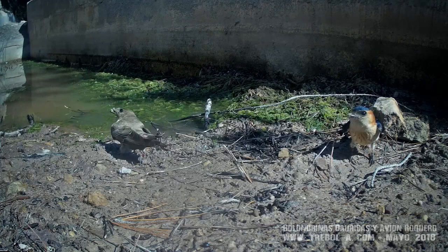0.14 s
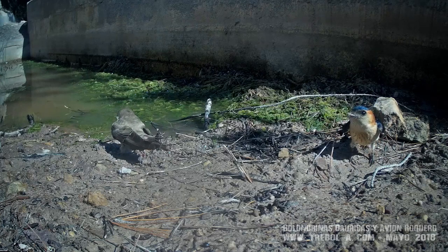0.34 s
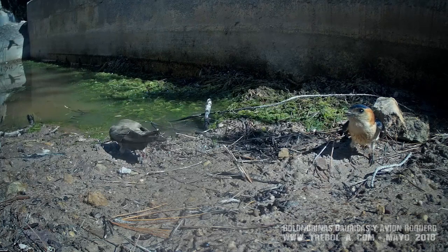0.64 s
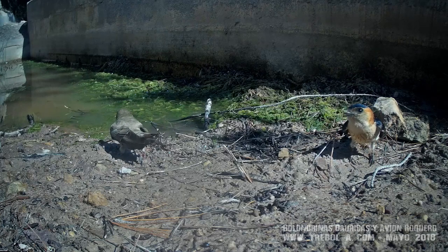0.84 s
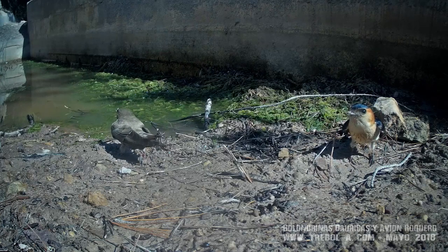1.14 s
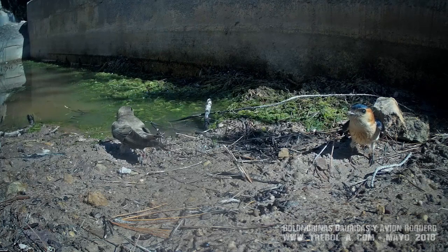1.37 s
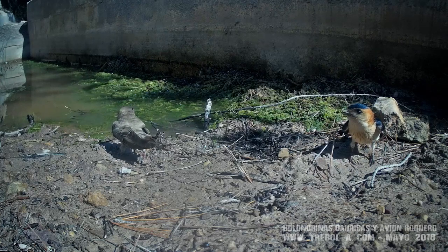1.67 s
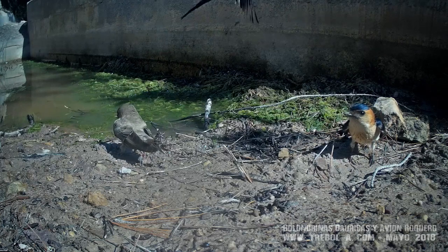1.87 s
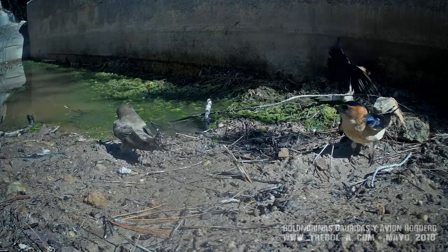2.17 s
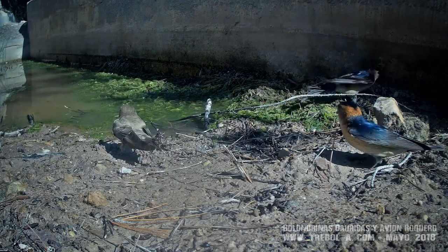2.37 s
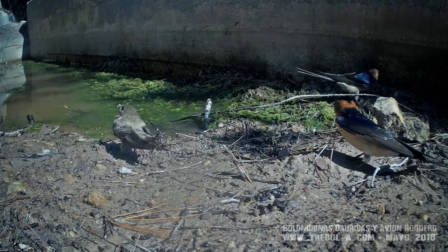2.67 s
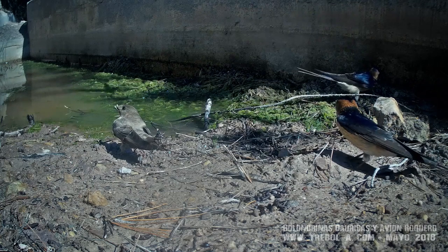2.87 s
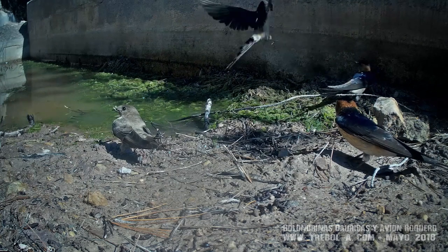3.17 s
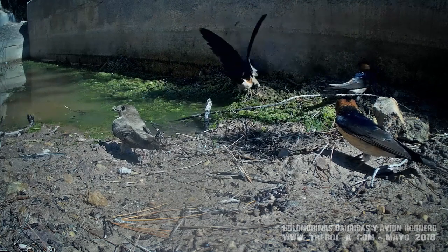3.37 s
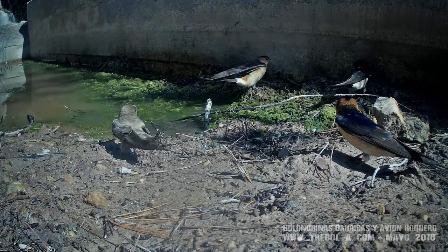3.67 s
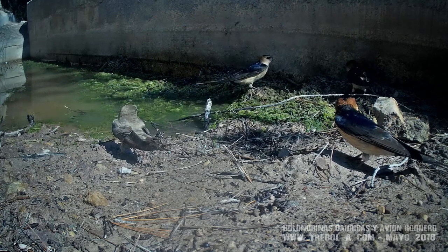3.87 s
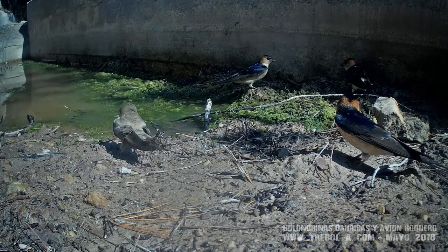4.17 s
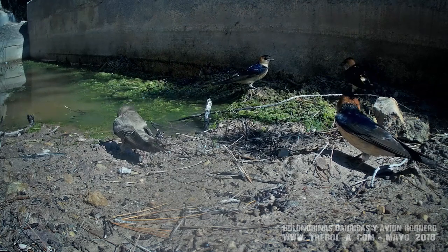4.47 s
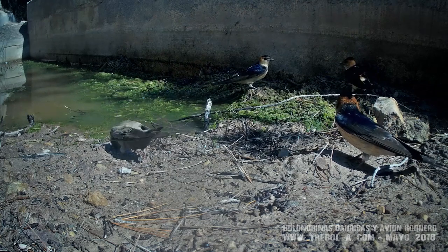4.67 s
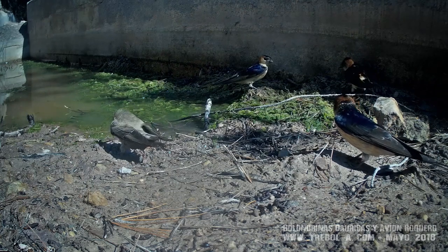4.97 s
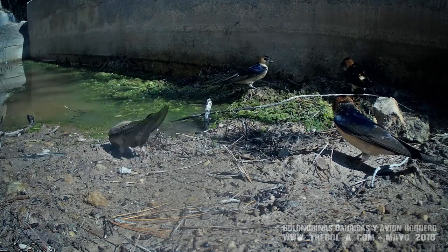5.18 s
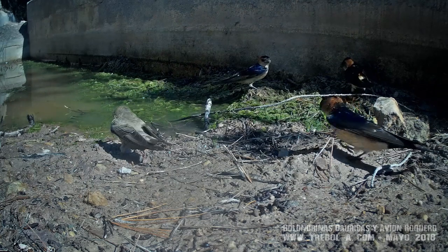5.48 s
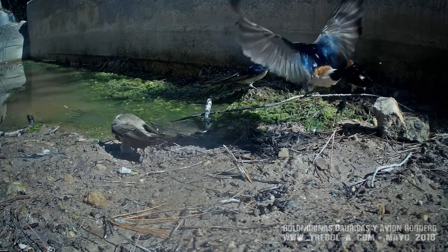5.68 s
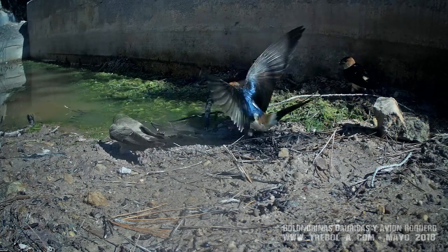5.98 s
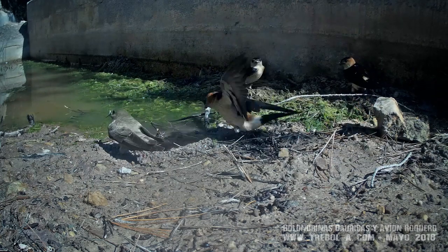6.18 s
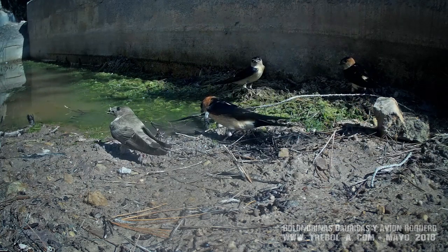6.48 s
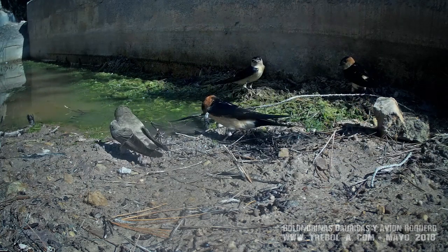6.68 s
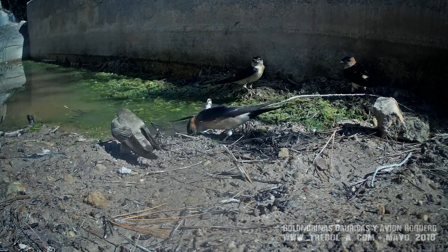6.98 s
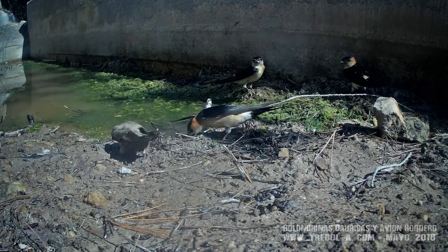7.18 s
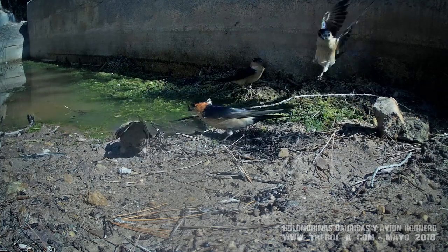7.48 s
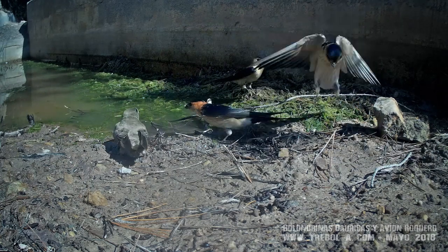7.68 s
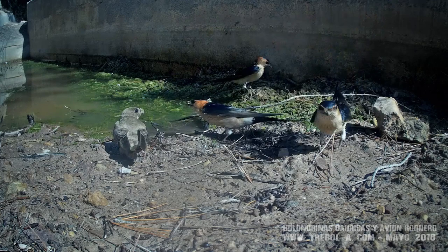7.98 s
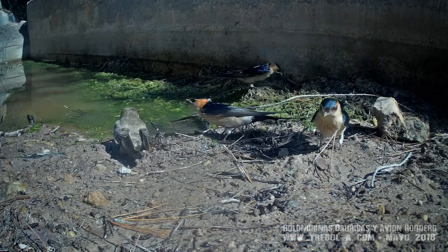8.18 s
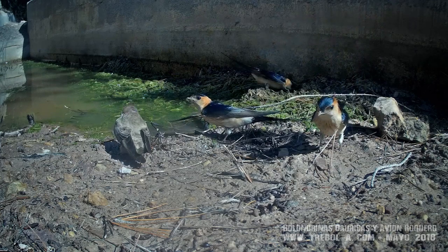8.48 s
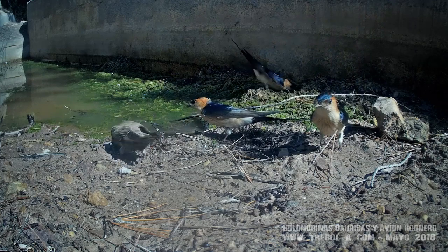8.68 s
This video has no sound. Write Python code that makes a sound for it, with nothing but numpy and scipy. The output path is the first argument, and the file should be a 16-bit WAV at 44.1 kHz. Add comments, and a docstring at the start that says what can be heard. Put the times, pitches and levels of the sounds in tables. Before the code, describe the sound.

Small birds trade short, bright chirps beside a muddy puddle, one close and others more distant, over a faint rush of air.

```python
"""A nearby swallow gives quick two-part chirps at a muddy puddle under a concrete wall. Birds further off
answer; the first chirp ends in an extra short glide, and a few short single notes fall in between. Each chirp
is one tone with overtones that climbs, breaks downward and climbs again, coloured by the fixed resonances of
the throat. The wall returns a short echo; a light breeze, passing wings and a faint hiss lie underneath."""
import sys
import numpy as np
from scipy import signal
from scipy.fft import rfft, irfft, next_fast_len
from scipy.io import wavfile
from scipy.ndimage import uniform_filter1d, map_coordinates

SR = 44100
rng = np.random.default_rng(int(sys.argv[2]) if len(sys.argv) > 2 else 0)


def log_audio(samples):
    """Write samples as a 16-bit WAV file to the path given in sys.argv[1]."""
    # one column per channel
    frames = np.atleast_2d(samples).T
    # limit to full scale, then quantise
    limited = np.clip(frames, -1, 1)
    pcm = np.round(limited * 32767).astype(np.int16)
    wavfile.write(sys.argv[1], SR, pcm)


N = 389403

# puffs of breeze on the microphone: t/s, level/dB
BREEZE_PUFFS = [(.76, -61), (2.999, -59), (3.18, -59), (3.72, -64), (3.95, -56), (4.241, -62), (5.68, -59),
                (5.92, -60), (7.45, -62), (7.8, -59.5)]
# how the rush of air and wings swells and fades: t/s, level/dB
RUSH_LEVELS = [(0.0, -62.5), (0.98, -59.5), (1.4, -62), (2.24, -58), (2.73, -60.5), (3.42, -58.5),
               (3.54, -61.5), (5.75, -62), (5.85, -57.5), (5.9, -61.5), (8.76, -61.5), (8.83, -63)]
# how strong each noise is from low to high pitch: f/Hz, relative level/dB
RUMBLE_COLOUR = [(15, -6.5), (30, -3), (70, -1), (120, -6), (250, -38), (600, -78)]
RUSH_COLOUR = [(40, -14.5), (120, -0.5), (300, -3), (600, -9), (1200, -15), (2500, -24), (6000, -42.5)]
HISS_COLOUR = [(200, 2), (1500, -7), (3500, 0.5), (7000, -0.5), (12000, -1.5), (16000, -4.5)]
FEATHER_COLOUR = [(150, -5.5), (600, 0), (1300, 8), (2500, -20), (5200, -12.5), (12000, -30)]
# wing flicks of a landing bird: t/s, level/dB, length/s
WING_FLICKS = [(7.463, -54.5, .012), (7.598, -64, 0.07), (7.77, -72, 0.046)]

# bounces off mud and bank, and off the wall's flat faces: delay/s, gain
GROUND_BOUNCES = [(.0021, 0.05), (.0029, 0.1195)]
WALL_BOUNCES = [(.0165, .5), (.0208, .42), (.029, .36)]
# how long the wall's scattered echo takes to fade by 60 dB: f/Hz, time/s
WALL_FADE = [(500, 0.34), (2000, 0.135), (4000, .1), (7000, 0.041), (14000, 0.16)]
# the broader colour that a voice throws at the wall: f/Hz, level/dB
ECHO_COLOUR = [(700, -5), (1500, -2), (2500, 4), (3900, -1), (5000, 0), (6500, -7), (8000, -23.5),
               (11000, -18), (15000, -26.5)]

# throat resonances, heard on the straight path from each bird: f/Hz, level/dB
FAR_RESONANCES = [(700, -12), (1300, 0), (1850, 7), (2400, 5), (3400, -4), (4150, -7), (4700, 7),
                  (5400, -4.5), (6600, -1), (7500, -5.5), (10500, 0.5), (15500, -18)]
NEAR_RESONANCES = [(600, -2), (1200, -6), (1850, 4), (2550, -2.5), (3100, -3), (3600, 9.5), (4100, -5.5),
                   (5300, 1.5), (6700, -8.5), (7500, -23.5), (9000, -14), (11200, -6.5), (13300, -20.5),
                   (15000, -21.5)]
# short notes (the first closes the first near chirp with a third syllable): start t/s, end t/s, start f/Hz, end
# f/Hz, level/dB
SHORT_NOTES = [(0.739, 0.757, 1408, 2023, -32), (5.988, 6.006, 780, 810, -49),
               (6.007, 6.037, 850, 825, -51.5), (6.062, 6.106, 672, 644, -59.5)]
# chirps (the crest ends the first climb):
# start t/s, first climb/s, crest f/Hz, first part level/dB, second part level/dB
FAR_CHIRPS = [(.375, 0.051, 1698, -77, -77), (0.884, 0.045, 2090, -51.5, -44.5),
              (1.3, 0.052, 2037, -74.5, -72), (2.465, 0.059, 2084, -43, -44), (2.65, 0.057, 2087, -50, -44),
              (2.89, 0.061, 2007, -42.5, -35.5), (3.08, .074, 2013, -51, -50),
              (3.44, .07, 1961, -51.5, -49), (3.705, 0.072, 1873, -52, -58),
              (4.236, .079, 1680, -56.5, -44), (4.502, 0.079, 1696, -55.5, -57),
              (4.765, 0.067, 1664, -49, -54.5), (5.805, .085, 1706, -57, -58.5),
              (6.322, 0.074, 1613, -59, -69)]
NEAR_CHIRPS = [(.61, 0.08, 1580, -34, -29), (.829, .072, 1620, -34, -28), (1.064, 0.069, 1602, -34.5, -30),
               (1.537, .081, 1632, -34.5, -27), (1.769, 0.073, 1650, -34, -26.5),
               (2.157, 0.09, 1568, -35, -28.5), (2.389, 0.076, 1624, -35, -28.5),
               (2.842, 0.072, 1594, -37.5, -28.5), (3.258, .081, 1624, -37.5, -31),
               (3.957, .095, 1390, -44.5, -42.5), (4.325, .083, 1430, -41.5, -36.5),
               (4.708, .098, 1385, -43.5, -51)]
# a chirp's pitch at its start, halfway point, dip and top:
# f/Hz at the usual crest, power by which it follows the crest (negative: moves the other way)
FAR_PITCH_POINTS = [(1150, 0.19), (1470, .75), (1570, .7), (2250, 0.75)]
NEAR_PITCH_POINTS = [(621.6, -1.5), (1248, .9), (1096.5, 0.89), (2006, 0.43)]
# the near bird turns its beak away and partly back: t/s, treble level/dB
BEAK_TREBLE = [(.7, 2), (1.8, -2), (2.25, -5), (2.9, -5.5), (3.35, -2.5), (4.1, 1.5)]


def amp(db):
    """Turn decibels into a gain."""
    return 10 ** (np.asarray(db) / 20)


def unit(x):
    """Scale x to an average (rms) level of 1."""
    return x / np.sqrt(np.mean(x ** 2) + 1e-20)


def along(points, hz):
    """Read a (Hz, value) table at hz, on a log axis."""
    f, v = np.transpose(points)
    return np.interp(np.log(hz + 1), np.log(f), v)


def wobble(rate, size):
    """A smooth curve through rate random values a second."""
    knots = rng.standard_normal(int(size * rate / SR) + 4)
    return map_coordinates(knots, [np.arange(size) * rate / SR])


def filtered(x, response):
    """Scale each frequency of a whole track by response(hz)."""
    m = next_fast_len(N + SR // 2)
    return irfft(rfft(x, m) * response(np.fft.rfftfreq(m, 1 / SR)), m)[:N]


def coloured(x, spectrum):
    """Shape a short sound with a (Hz, dB) table."""
    m = next_fast_len(2 * len(x))
    gain = amp(along(spectrum, np.fft.rfftfreq(m, 1 / SR)))
    return irfft(rfft(x, m) * gain, m)[:len(x)]


def noise(spectrum):
    """Noise shaped by a (Hz, dB) table, at level 1."""
    return unit(filtered(rng.standard_normal(N), lambda hz: amp(along(spectrum, hz))))


def add(track, s, x):
    """Mix x into the track from time s."""
    i = round(s * SR)
    track[i:i + len(x)] += x[:N - i]


def hiss(level_db=-70):
    """A faint, steady hiss."""
    return amp(level_db) * noise(HISS_COLOUR)


def breeze(calm_db=-65, waver_db=2.0, puff_half_s=.05):
    """Wind on the microphone: a low, wavering rumble with brief puffs."""
    t = np.arange(N) / SR
    puffs = sum(amp(db) * np.exp(-((t - s) / puff_half_s) ** 2) for s, db in BREEZE_PUFFS)
    calm = amp(calm_db + waver_db * wobble(4.1, N))
    return (calm + puffs) * noise(RUMBLE_COLOUR)


def air_rush(gain_db=2):
    """Moving air and passing wings make a soft rush."""
    level_db = np.interp(np.arange(N) / SR, *np.transpose(RUSH_LEVELS))
    return amp(level_db + gain_db) * noise(RUSH_COLOUR)


def wings():
    """Each flick of the feathers is a soft puff of noise."""
    track = np.zeros(N)
    for s, db, length in WING_FLICKS:
        size = int(length * SR)
        puff = unit(coloured(rng.standard_normal(size), FEATHER_COLOUR))
        add(track, s, amp(db) * puff * np.hanning(size))
    return track


def bounces(rows):
    """An echo pattern: one spike for each path the sound takes."""
    response = np.zeros(SR // 2)
    for delay, gain in rows:
        response[round(delay * SR)] += gain
    return response


def wall_echo(tone, scatter_db=-3, gap_s=.013, linger_db=-34, linger_s=0.35):
    """The wall's flat faces give clear bounces; its rough surface scatters a fading tail."""
    hz, t, bands = signal.stft(rng.standard_normal(SR // 2), SR, nperseg=128)
    decay = amp(-60 * t / along(WALL_FADE, hz)[:, None]) + amp(linger_db - 60 * t / linger_s)
    tail = signal.istft(bands * decay, SR, nperseg=128)[1]
    tail = amp(scatter_db) * tail / np.linalg.norm(tail)
    scatter = np.pad(tail, (int(gap_s * SR), 0))[:SR // 2]
    return signal.fftconvolve(coloured(tone, ECHO_COLOUR), bounces(WALL_BOUNCES) + scatter)


def heard(tone, throat, echo_db):
    """A call as it arrives: straight and off the ground, then back from the wall."""
    paths = bounces([(0.0018, 0.99)] + GROUND_BOUNCES)  # the straight path comes first
    direct = signal.fftconvolve(coloured(tone, throat), paths)
    return direct + amp(echo_db) * wall_echo(tone)


def voice(pitch, level_db, rasp, slope_db, odd_db, jitter=0.01212, count=20):
    """A bird's voice box makes harmonics (multiples of the pitch); the second leads, odd ones are weak."""
    size = len(pitch)
    pitch = pitch * (1 + jitter * wobble(600, size))
    k = np.arange(1, count + 1)[:, None]  # harmonic numbers
    harmonic_db = slope_db * np.log2(np.maximum(k / 2, 1)) + odd_db * (k % 2)
    strength = amp(harmonic_db) * (k * pitch < SR / 2)
    # uneven vibration makes every harmonic a little noisy
    flutter = 1 + rasp * np.array([wobble(2000, size) for _ in k])
    tone = (strength * flutter * np.sin(2 * np.pi * k * np.cumsum(pitch) / SR)).sum(0)
    fade = signal.windows.tukey(size, min(1, .005 * SR / size))
    return tone * fade * amp(level_db + wobble(350, size))


def pitch_path(row, points, usual_hz, break_s, second_climb_s, hook_s=.012, hook_ratio=.76):
    """Times and pitches of a chirp's start, halfway point, crest, dip, top and end."""
    start, climb_s, crest_hz = row[:3]
    start_hz, half_hz, dip_hz, top_hz = [hz * (crest_hz / usual_hz) ** power for hz, power in points]
    crest = start + climb_s
    top = crest + break_s + second_climb_s
    return ([start, start + climb_s / 2, crest, crest + break_s, top, top + hook_s],
            [start_hz, half_hz, crest_hz, dip_hz, top_hz, hook_ratio * top_hz])


def chirp(row, corners, usual_hz, sag_db, slope_db, odd_db, onset_db, break_db, release_db, rasp):
    """A slow climb, a sudden break, then a steep climb that hooks down at the end."""
    crest_hz, first_db, second_db = row[2:]
    start, half, crest, dip, top, end = corners[0]
    t = np.arange(start, end, 1 / SR)
    pitch = uniform_filter1d(np.interp(t, *corners), size=100)  # the muscles round every corner
    pitch = pitch * (1 + .018 * wobble(90, len(t)))  # no two climbs bend alike
    settled = start + .41 * (crest - start)
    peak = dip + .68 * (top - dip)
    push_db = sag_db * np.log2(crest_hz / usual_hz)  # a low chirp runs out of push before the break
    first = first_db + np.array([onset_db, 0.5, 2.5 + push_db, break_db + push_db])  # start to dip
    second = second_db + np.array([3, 1, release_db])  # peak to end
    level_db = np.interp(t, [start, settled, crest, dip, peak, top, end], np.r_[first, second])
    hoarseness = rasp * np.interp(t, [half, crest, dip, top], [.3, 1.2, .9, .5])
    return voice(pitch, level_db, hoarseness, slope_db, odd_db)


def short_notes():
    """Short hoarse notes that slide in pitch: a third syllable that closes the first near chirp, and a few lone
    notes later on."""
    track = np.zeros(N)
    for start, end, start_hz, end_hz, db in SHORT_NOTES:
        pitch = np.linspace(start_hz, end_hz, int((end - start) * SR))
        note = voice(pitch, db, rasp=.35, slope_db=-9.5, odd_db=-6.5)
        add(track, start, heard(note, NEAR_RESONANCES, echo_db=-6.0))
    return track


def far_swallows(gain_db=-1.5, usual_crest_hz=1861):
    """The answering birds: higher, duller and with more echo."""
    track = np.zeros(N)
    for row in FAR_CHIRPS:
        corners = pitch_path(row, FAR_PITCH_POINTS, usual_crest_hz, break_s=.014, second_climb_s=.027)
        call = chirp(row, corners, usual_crest_hz, sag_db=6, slope_db=-8.5, odd_db=-6,
                     onset_db=-2, break_db=1.5, release_db=-10.5, rasp=.6)
        add(track, row[0], heard(call, FAR_RESONANCES, echo_db=-1.5))
    return amp(gain_db) * track


def near_swallow(usual_crest_hz=1601, beam_from_hz=3900, beam_full_hz=6500):
    """The close bird: bright chirps, roughest at the break; its treble goes where the beak points."""
    track = np.zeros(N)
    for row in NEAR_CHIRPS:
        corners = pitch_path(row, NEAR_PITCH_POINTS, usual_crest_hz, break_s=.005, second_climb_s=.038)
        call = chirp(row, corners, usual_crest_hz, sag_db=23, slope_db=-4.5, odd_db=-8.5,
                     onset_db=-15, break_db=4.5, release_db=-7.0, rasp=.38)
        treble_db = np.interp(row[0], *np.transpose(BEAK_TREBLE))
        call = coloured(call, [(beam_from_hz, 0), (beam_full_hz, treble_db)])
        add(track, row[0], heard(call, NEAR_RESONANCES, echo_db=-6.5))
    return track


def scene():
    """Birds and background, mixed into one channel."""
    birds = near_swallow() + far_swallows() + short_notes() + wings()
    return (birds + breeze() + air_rush() + hiss())[None]


def record(dry, top_hz=15750):
    """Cut away the very highest treble."""
    return filtered(dry[0], lambda hz: hz < top_hz)[None]


dry = scene()
out = record(dry)
log_audio(out)
```